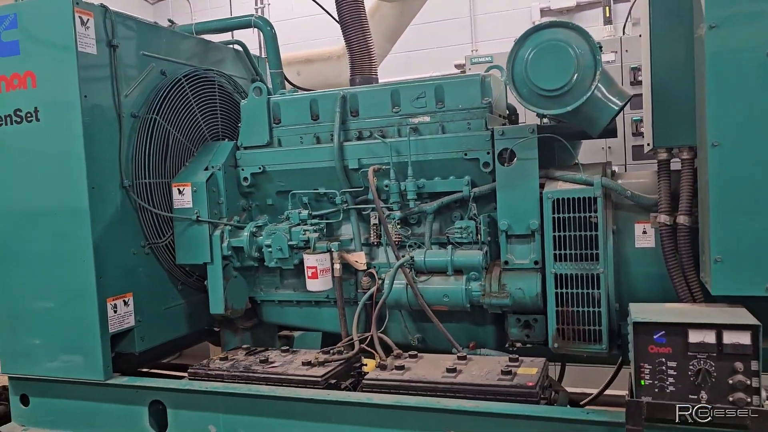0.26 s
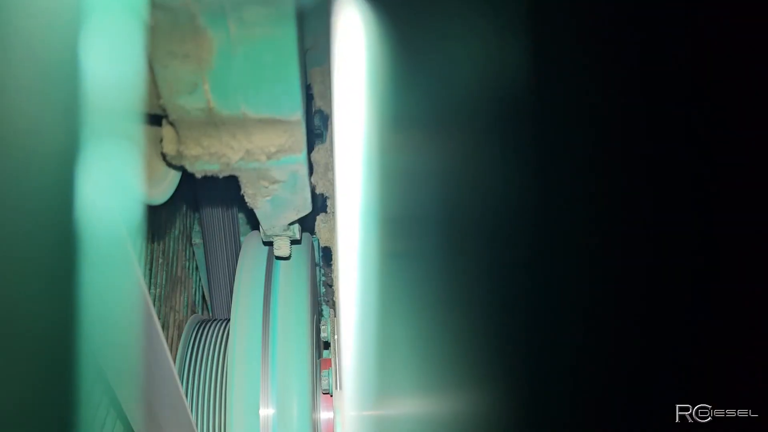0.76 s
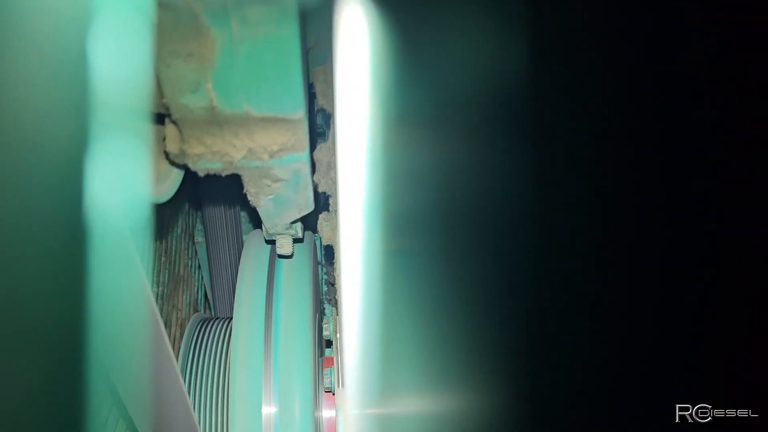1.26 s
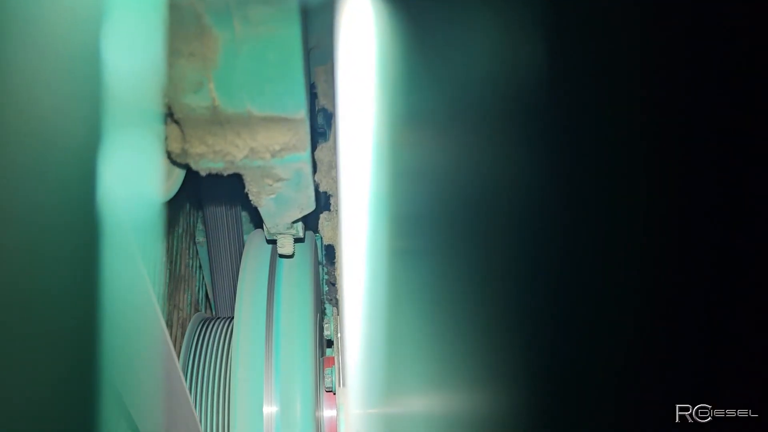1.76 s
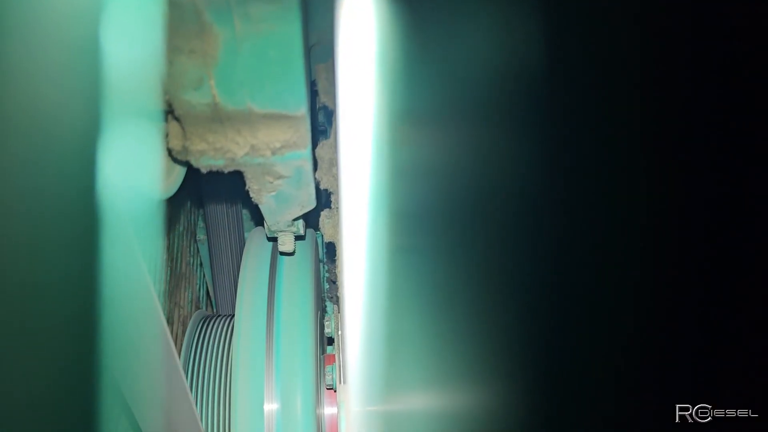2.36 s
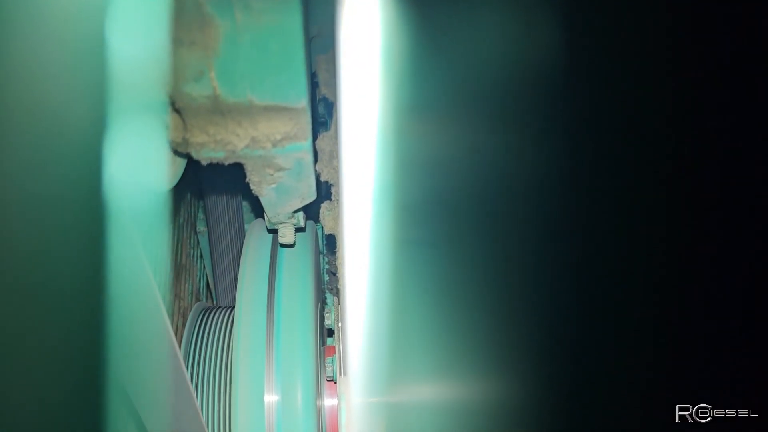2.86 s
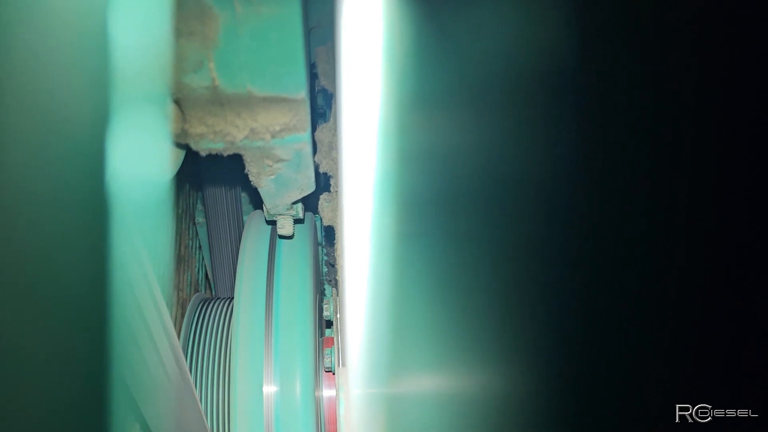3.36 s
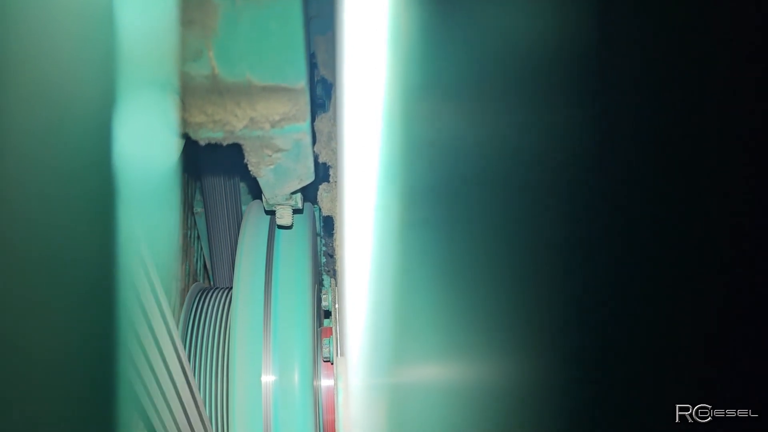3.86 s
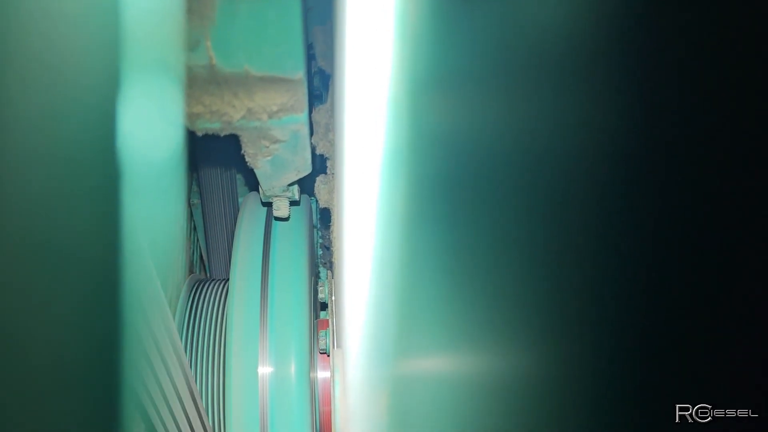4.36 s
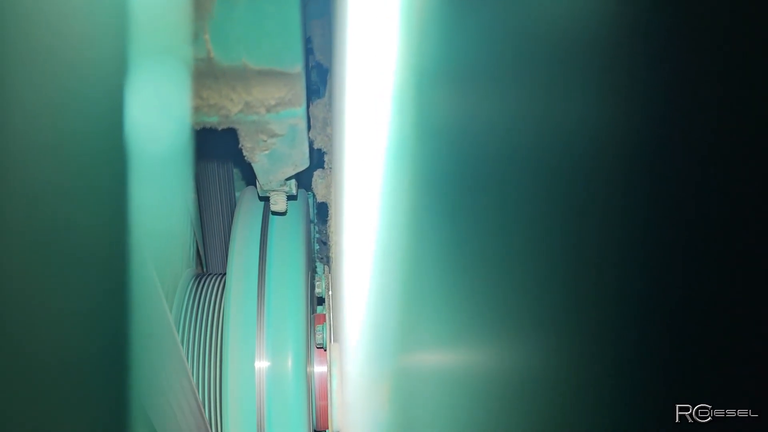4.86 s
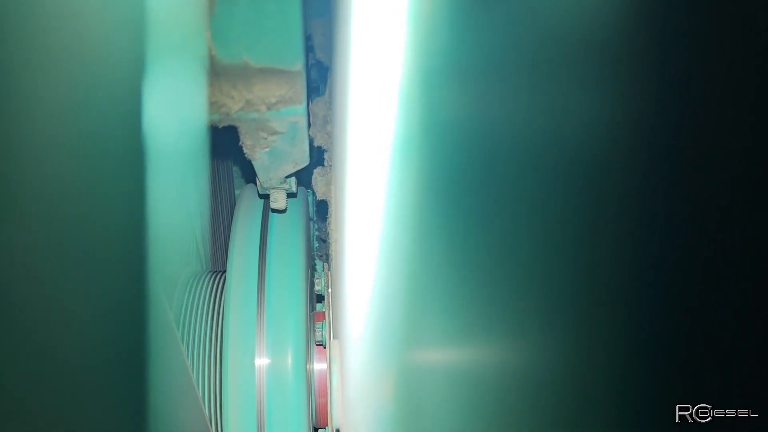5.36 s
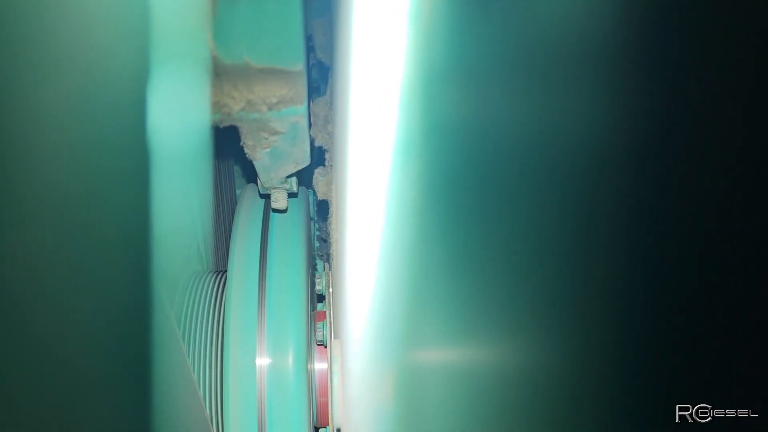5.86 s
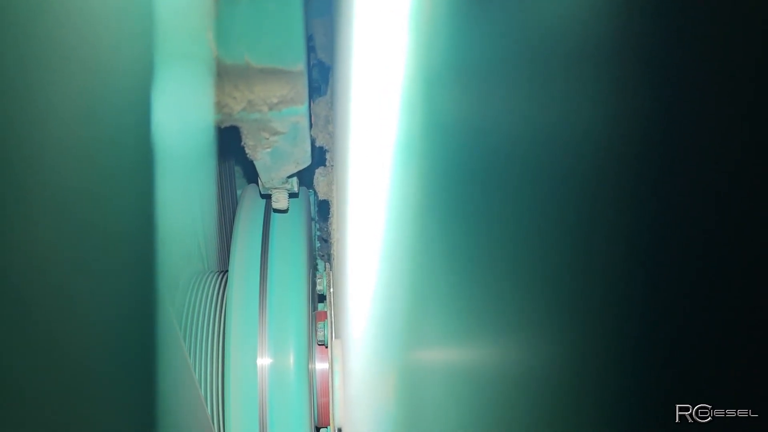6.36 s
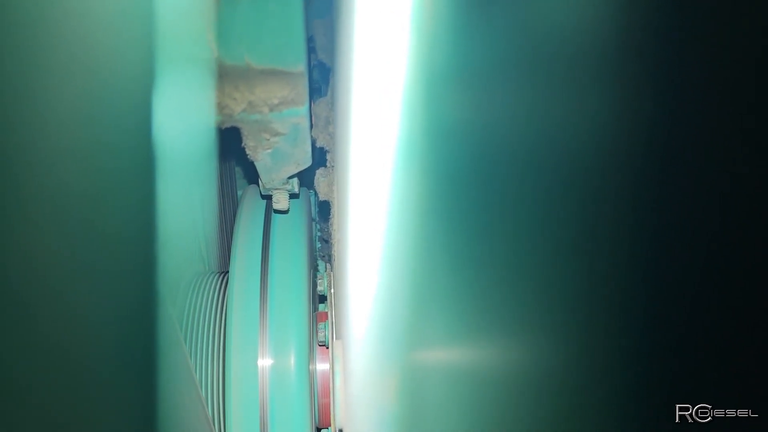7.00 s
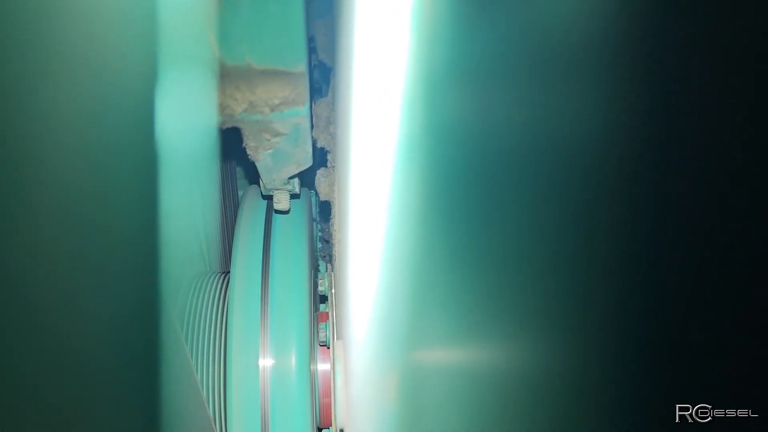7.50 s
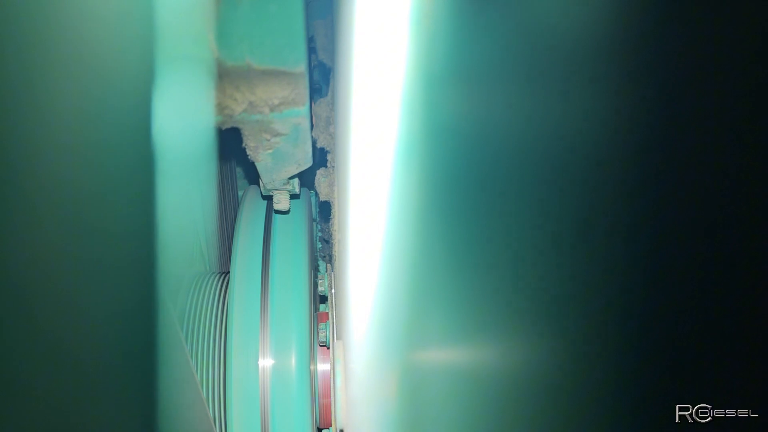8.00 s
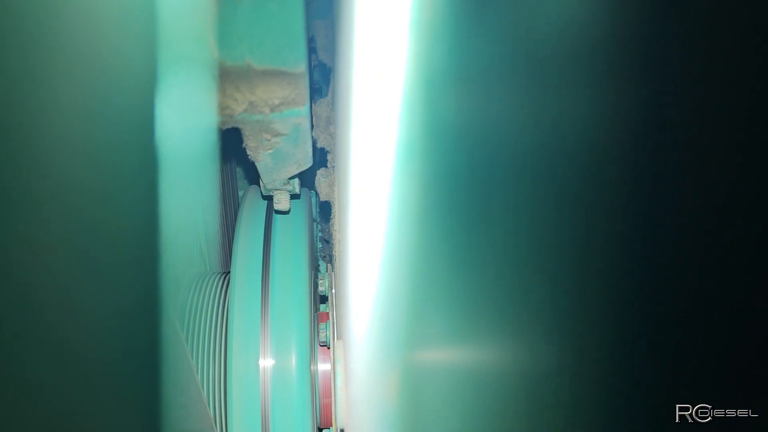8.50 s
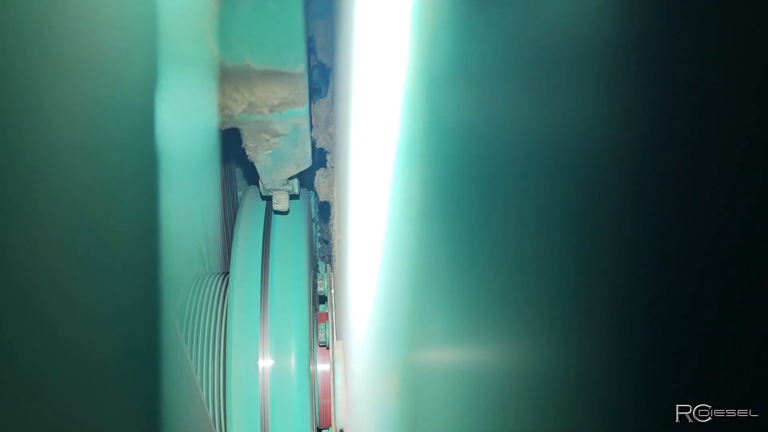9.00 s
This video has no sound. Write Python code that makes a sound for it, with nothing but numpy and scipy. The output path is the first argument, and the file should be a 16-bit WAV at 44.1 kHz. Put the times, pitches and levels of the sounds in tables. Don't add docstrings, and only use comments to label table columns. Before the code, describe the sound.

A large diesel generator hums briefly from across a room, fades out, then its radiator fan drones loudly up close through roaring, hissing air.

```python
import sys
import numpy as np
from scipy import signal
from scipy.fft import rfft, irfft, next_fast_len
from scipy.io import wavfile
from scipy.ndimage import uniform_filter1d

SR = 44100
rng = np.random.default_rng(int(sys.argv[2]) if len(sys.argv) > 2 else 0)


def persist_wave(psi):
    counts = np.round(np.clip(psi, -1, 1) * 32767).astype(np.int16)
    wavfile.write(sys.argv[1], SR, np.atleast_2d(counts).T)


def volts_from_db(level):
    exponent = np.asarray(level, float) / 20
    return 10 ** exponent


N = 407484
CYCLE_HZ = 14.996
BLADE_HZ = 179.5
STEPS = np.arange(0, N / SR + .01, .004)

# (frequency [Hz], level [dB], left-right [dB], left lead [rad])
FAR_TONES = [(44.9, -47, 0, 0), (90, -34, 0, 0), (135, -23.5, 1, .1), (164.5, -30, 0, 0),
             (179.5, -23, 2, .3), (239.2, -26.5, 1, .2), (314, -37, 0, 0), (359.2, -27, 2, .3),
             (390, -37, 4, 1.2), (510, -38, 0, .5), (538.6, -33.5, 3, .7), (719, -38, 0, .8),
             (780, -40, 0, 1.1), (1199.8, -42, 0, 1.5)]
# (frequency [Hz], likeness [0-1])
FAR_LIKENESS = [(60, 0.96), (180, 0.99), (300, 0.79), (550, 0.87), (900, 0.24), (1400, -0.0038),
                (2200, -0.063), (15000, -0.017)]
# (frequency [Hz], level [dB])
FAR_ROAR = [(25, -68), (60, -54.5), (170, -43), (300, -48.5), (430, -61), (550, -54), (800, -54),
            (1200, -55), (1900, -57.5), (2500, -64.5), (4000, -64), (10000, -68), (11600, -66.5),
            (16000, -70)]
# (time [s], level [dB])
FADE_IN = [
    (.515, -100),
    (.522, -54),
    (.535, -36),
    (.541, -21),
    (.551, -17),
    (.556, -5),
    (.565, -0.5),
]

# (time [s], level [dB])
BLADE_LEVEL = [(.6, -29.5), (.79, -20), (1.0, -19.5), (1.1, -18), (1.75, -18.5), (2.1, -16), (2.5, -17),
               (3.4, -16.5), (4.0, -17.5), (4.3, -16), (4.8, -15.5), (5.3, -17), (6.2, -16.5),
               (6.75, -16.2), (7.2, -16.5), (7.8, -18), (8.5, -17.3), (9.1, -16.5)]
# (time [s], length [s], loss [dB])
STALLS = [(1.42, .06, 0.5), (2.36, .1, 0.5), (2.64, 0.046, 0), (3.73, .06, 0.5), (3.92, .08, 1),
          (4.473, 0.048, 5), (4.59, .05, 1), (5.24, .08, 0), (5.448, .08, 3.5), (5.798, .07, 1),
          (6.96, 0.21, 3), (7.29, .05, 1.5), (7.46, .08, 1), (7.68, 0.15, 3), (8.28, 0.17, 3),
          (8.78, .08, 1.2), (9.143, 0.076, 3)]
# (time [s], share [0-1])
LURCHES = [
    (8.192, 0.67),
    (8.731, 0.64),
]
# (multiple of blade tone, level under it [dB], left-right [dB],
# left lead [rad], waver [dB])
LOW_HARMONICS = [(2, -21.5, -0.5, -0.94, 1), (3, -14, 2.5, .7, 1.2), (4, -20.5, -1.5, 1.4, 5)]
# (time [s], harmonic, length [s], loss [dB])
EDDIES = [(.75, 2, 1, 4), (1.075, 3, .2, 13), (1.33, 4, 0.088, 6), (1.383, 3, .4, -5.5),
          (1.88, 2, 0.24, -7), (1.922, 3, 0.24, -7), (2.15, 2, .2, 11), (2.53, 3, 0.18, 16),
          (2.65, 2, .3, 24), (2.998, 4, 0.25, 9), (3.0, 3, 0.34, 5), (3.55, 4, .15, 14),
          (3.698, 2, 0.49, 22), (4.0, 3, 0.25, -7.5), (4.08, 4, 0.14, -5), (4.25, 2, .4, -6),
          (4.6, 3, 0.21, 9), (4.87, 3, 0.17, -3), (5.5, 4, 0.13, 4), (5.75, 3, 0.76, 9),
          (5.9, 2, 0.57, 3.5), (6.3, 4, 0.42, 12), (6.9, 2, 0.7, 5), (7.152, 3, 0.38, 13),
          (7.375, 4, .15, -8), (7.774, 4, 0.27, -9), (8.37, 4, 0.19, -12), (8.7, 3, 0.14, 21),
          (8.75, 4, 0.28, 8)]
# (multiple of blade tone, level under it [dB], left-right [dB],
# left lead [rad], waver [dB])
HIGH_HARMONICS = [(5, -18, 1.5, 2.4, 6.5), (6, -26, 4, 2.56, 5.5), (7, -21, 1.5, 2.3, 1),
                  (8, -25, 8.5, 4.4, 2.5), (9, -20, 0, 4.3, 0), (10, -31, -10, 4.3, 4.5)]
# (multiple of cycle, level under blade tone [dB], left-right [dB],
# left lead [rad])
ENGINE_ORDERS = [(4, -35, -3, -0.5), (5.97, -40.5, -1, -1), (8.96, -27, -4, -1), (16.1, -32, -5, 1),
                 (26.07, -28.5, -10.5, 1.1), (51.7, -30.5, -9, 0.5), (56.3, -36, -7, 2), (65.6, -47, 9, -3),
                 (71.3, -48, 17, 5), (75.5, -31, 1, 4.5), (75, -45, 1, 5), (80.7, -30.5, 0.5, 1.5)]

# (frequency [Hz], level per Hz [dB])
AIR_COLOUR = [(20, -79), (40, -69.5), (90, -60), (165, -46.5), (230, -56), (330, -54.5), (440, -55.5),
              (560, -52), (800, -54.5), (1000, -54.5), (1250, -49), (1600, -55.5), (2000, -57),
              (16000, -60.5)]
# (frequency [Hz], width [Hz], level [dB])
SHROUD = [(427, 39, -4.5), (655, 68, 2.5), (854, 53, 2), (2270, 110, 2.5), (2550, 200, -0.5), (2740, 98, 4),
          (3980, 230, 3.5), (6100, 250, -2), (6270, 300, 4.5), (7330, 300, 2.3)]
# (frequency [Hz], level [dB])
LEFT_PORT = [(2000, 0.5), (3000, -5.5), (5300, -3.5), (5900, -6), (6500, -6), (7300, -2.5), (8300, -4.5),
             (9800, -4.5), (10000, -8), (10800, -3.5), (11500, 0), (12300, -2), (14500, -2.5), (15700, 0)]
RIGHT_PORT = [(1900, -1), (2250, 2.5), (2700, -1.5), (3500, -1.5), (4000, -0.5), (4600, -2.5), (5850, -6),
              (6350, -3), (7300, -1.5), (8400, -5.5), (10100, -14.5), (11500, -2.5), (12800, -12),
              (14500, -1.5), (15700, -15)]
# (frequency [Hz], likeness [0-1])
AIR_LIKENESS = [(30, 0.92), (150, 0.97), (280, 0.61), (420, 0.14), (550, 0.96), (800, 0.41), (1400, 0.75),
                (2000, .35), (2600, 0.068), (5600, 0.26), (6500, .08), (16000, .04)]
# (frequency [Hz], left lead [rad])
AIR_LEAD = [(30, 1), (350, -0.04), (550, 0.5), (800, 1.56), (1000, 3), (1500, 3.5), (2000, 5.5),
            (2600, 7.5), (5400, 9), (6200, 12.5), (16000, 30)]
# (time [s], level [dB])
AIR_LEVEL = [(.57, -29.5), (.62, -31.5), (.67, -34), (.8, -33), (1.1, -29.5), (1.6, -29), (2.6, -28.5),
             (3.4, -27), (4.9, -27), (5.4, -26), (7, -25.5), (8.2, -24.5), (9.24, -25)]
# (time [s], length [s], rise [dB])
GUSTS = [(0.755, 0.044, -1), (0.882, 0.071, 0), (1.0, 0.031, 3.5), (1.2, 0.071, 5.5), (1.385, 0.047, 4.5),
         (1.75, 0.2, 2.5), (2.146, 0.056, 0.5), (2.484, 0.17, 1.5), (2.711, .05, 4), (2.925, .08, 2.5),
         (3.004, 0.033, 1.5), (3.203, 0.13, 0.5), (4.265, 0.22, 1.3), (6.817, 0.12, 1), (8.16, 0.079, 1.5)]
# (time [s], peak level [dB])
BUFFETS = [(1.574, -29), (1.728, -23), (1.852, -32), (2.251, -33), (2.332, -19), (3.326, -31), (3.638, -38),
           (3.99, -22), (4.336, -37), (4.538, -30), (4.999, -38), (5.119, -26), (5.396, -36), (5.755, -26),
           (6.138, -42), (6.457, -33), (6.741, -44), (6.994, -25), (7.289, -31), (7.617, -28),
           (7.741, -27.5), (8.127, -23), (8.687, -35), (9.005, -31)]
KNOCK = [11.5, 7, -1, -6, 10.5, -4]


def read(points, hz):
    f, value = np.transpose(points)
    return np.interp(np.log(hz + 1), np.log(f + 1), value)


def curve(rows, t):
    times, levels = np.transpose(rows)
    return np.interp(t, times, levels)


def bump(t, s, length):
    return np.exp(-(2 * (t - s) / length) ** 2)


def bumps(t, rows):
    return sum(height * bump(t, s, length) for s, length, height in rows)


def evened(x):
    return x / np.sqrt(np.mean(x ** 2) + 1e-20)


def wander(top_hz, t=STEPS, low_hz=.4):
    f, phase = np.geomspace(low_hz, top_hz, 24), rng.random(24)
    sines = np.sin(2 * np.pi * (f * t[:, None] + phase))
    return evened((sines / f ** 0.047).sum(1))


def noise_pair(colour_db, likeness, lead, size):
    a, b, c, d = rng.standard_normal((4,) + colour_db.shape[1:])
    likeness = np.clip(likeness, -1, 1)[:, None]
    left, other = a + 1j * b, c + 1j * d
    right = likeness * left + np.sqrt(1 - likeness ** 2) * other
    right = right * np.exp(-1j * lead)[:, None]
    spectra = np.array([left, right]) * volts_from_db(colour_db)
    return signal.istft(spectra, nperseg=size, noverlap=size * 3 // 4)[1][:, :N]


def tone(t, hz, db, left_db=0, lead=0):
    side = np.array([[.5], [-.5]])
    cycles = ((hz * t + rng.random()) % 1).astype(np.float32)
    sine = np.exp(2j * np.pi * cycles) * np.interp(t, STEPS, volts_from_db(db))
    return (np.sqrt(2) * volts_from_db(side * left_db) * np.exp(1j * side * lead) * sine).real


def wide_shot(t):
    hz, count = np.fft.rfftfreq(1024, 1 / SR), len(t) // 256 + 5
    colour = read(FAR_ROAR, hz)[None, :, None] + np.zeros((2, 1, count))
    air = volts_from_db(-17.5) * evened(noise_pair(colour, read(FAR_LIKENESS, hz), 0 * hz, size=1024))
    out = air[:, :len(t)]
    for f, db, left_db, lead in FAR_TONES:
        out = out + tone(t, f, db - .6 + 1.3 * wander(16), left_db, lead)
    return out


def fade_out(t):
    fade_s, bend, floor_db = 0.43, 1.42, -64
    ramp = np.clip(1 - (t / fade_s) ** bend, 0, 1)
    trace = np.clip((.5 - t) / .07, 0, 1) ** 2
    return ramp + volts_from_db(floor_db) * trace


def blades(t):
    level_db = curve(BLADE_LEVEL, STEPS)
    sway_s = np.interp(t, STEPS, wander(8)) / (2 * np.pi * BLADE_HZ)
    flutter_db = 0.53 * wander(60) + 0.23 * wander(10, low_hz=1.8)
    main_db = level_db - bumps(STEPS, STALLS) + 0.37 + flutter_db
    out = tone(t + 0.21 * sway_s, BLADE_HZ, main_db, lead=0.085)
    for s, share in LURCHES:
        out = out * (1 + np.array([[share], [-share]]) * (abs(t - s) < .012))

    slow_db = uniform_filter1d(level_db, size=120)
    for k, db, left_db, lead, waver_db in LOW_HARMONICS:
        lost_db = bumps(STEPS, [(s, length, loss) for s, h, length, loss in EDDIES if h == k])
        waver = waver_db * wander(9, low_hz=1.5) + 2.0 * wander(40)
        out += tone(t + 0.048 * sway_s, k * BLADE_HZ, slow_db + db - lost_db + waver, left_db, lead)
    for k, db, left_db, lead, waver_db in HIGH_HARMONICS:
        harmonic_db = slow_db + db - 3.5 + waver_db * wander(25)
        out += tone(t + 0.043 * sway_s, k * BLADE_HZ, harmonic_db, left_db, lead)
    return out + engine_orders(t, slow_db)


def engine_orders(t, fan_db):
    return sum(tone(t, k * CYCLE_HZ, fan_db + db - .6 + 2.2 * wander(11), left_db, lead)
               for k, db, left_db, lead in ENGINE_ORDERS)


def air_chop(t):
    firing = 6 * CYCLE_HZ * t
    strength = volts_from_db(np.array(KNOCK))[firing.astype(int) % 6]
    knock = strength * np.exp(-(firing % 1) / 0.42)
    return 1 + 0.024 * np.cos(2 * np.pi * BLADE_HZ * t) + 0.11 * knock


def roar(t):
    hz, frames = np.fft.rfftfreq(1024, 1 / SR), np.arange(N // 256 + 5) * 256 / SR
    column = hz[:, None]
    patches = rng.standard_normal((len(hz), len(frames)))
    patches = uniform_filter1d(patches, size=14, axis=0)
    patches = evened(uniform_filter1d(patches, size=10, axis=1))
    field = read(AIR_COLOUR, column) + 0.62 * patches + 0.37 * wander(40, frames)
    for f, width, db in SHROUD:
        field = field + db / (1 + (2 * (column - f) / width) ** 2)
    clatter = np.exp(-np.log((column + 1) / 2800) ** 2 / .5)
    field = field + 0.58 * clatter * wander(30, frames, low_hz=6.4)

    level_db = curve(AIR_LEVEL, frames)
    drift_db = level_db - level_db.mean()
    gust_db = 0.18 * wander(9, frames, low_hz=2.5) + bumps(frames, GUSTS)
    dull, body, rumble = [1 / (1 + (column / top_hz) ** 3) for top_hz in (6500, 900, 120)]
    since_change = np.maximum(frames - 0.67, 0)
    # share, dB per dB of drift, dB per dB of gust, own wander [dB], entry offset [dB], catch-up [s]
    parts = [(1 - dull, -0.69, -1.26, 0.23, -9, 0.18),
             (body - rumble, 0.31, -1.1, 0.9, 1.5, .15),
             (rumble, 0.36, -0.72, 2.5, -4, .2)]
    for share, per_drift, per_gust, own_db, late_db, late_s in parts:
        swing_db = per_drift * drift_db + per_gust * gust_db
        swing_db = swing_db + late_db * np.exp(-since_change / late_s)
        field = field + share * (swing_db + own_db * wander(10, frames, low_hz=.8))

    calm_db, lag_s, thud_s = -30, .02, 0.26
    buffet_db = bumps(frames, [(s + lag_s, thud_s, db - calm_db) for s, db in BUFFETS])
    flicker_db = 3 * wander(25, frames, low_hz=6)
    field = field + rumble * (buffet_db - buffet_db.mean() + flicker_db)

    ports = np.array([read(LEFT_PORT, hz), read(RIGHT_PORT, hz)])[:, :, None]
    air = noise_pair(field + ports, read(AIR_LIKENESS, hz), read(AIR_LEAD, hz), size=1024)
    return evened(air * air_chop(t)) * volts_from_db(np.interp(t, frames, level_db + gust_db) + 8.5)


def scene():
    t = np.arange(N) / SR
    out = (blades(t) + roar(t)) * volts_from_db(curve(FADE_IN, t))
    first = t[:SR // 2 + 1000]
    out[:, :len(first)] += wide_shot(first) * fade_out(first)
    return out


def low_pass(x):
    return signal.sosfilt(signal.butter(12, 15760, fs=SR, output="sos"), x)


def record(dry):
    size = next_fast_len(N)
    hz = np.fft.rfftfreq(size, 1 / SR)
    bass_cut = 1 / np.sqrt(1 + (30 / (hz + 1)) ** 4)
    heard = irfft(rfft(dry, size) * bass_cut, size)[:, :N]
    return low_pass(heard)


dry = scene()
out = record(dry)
persist_wave(out)
```